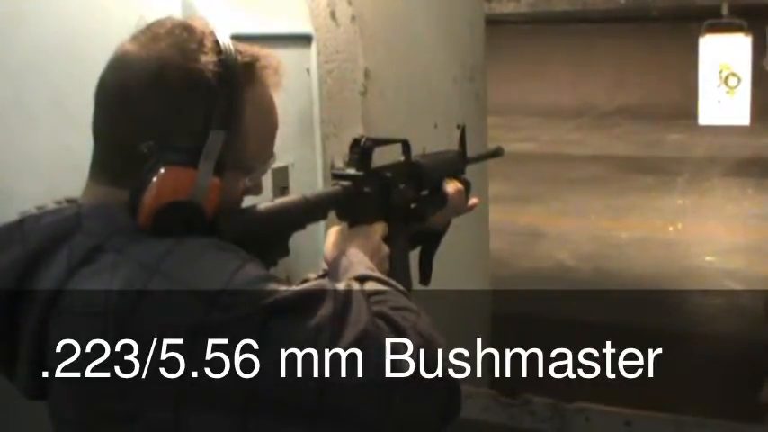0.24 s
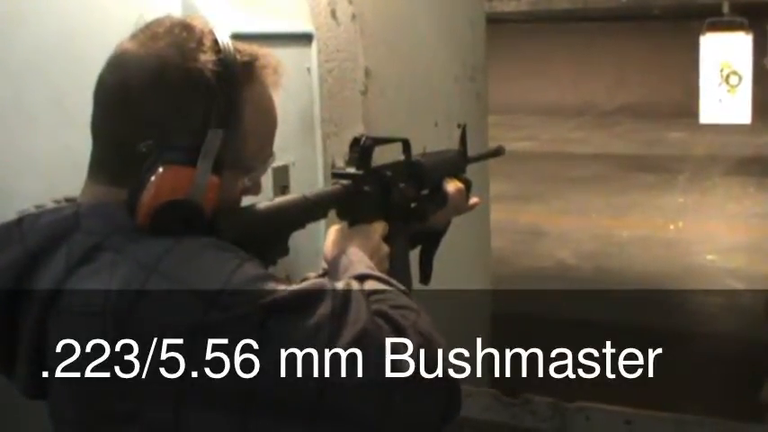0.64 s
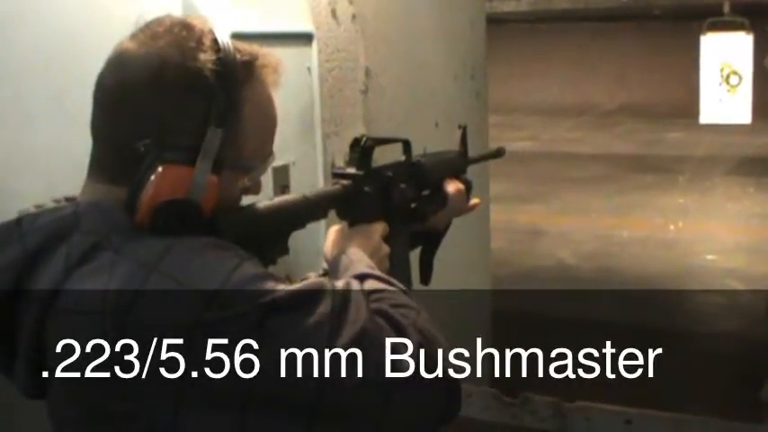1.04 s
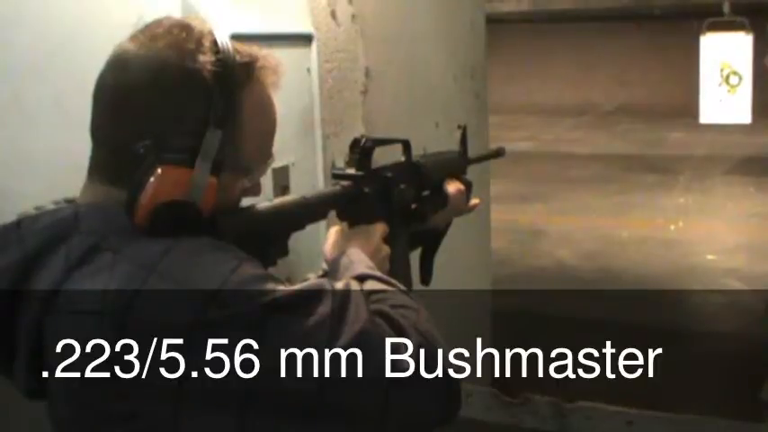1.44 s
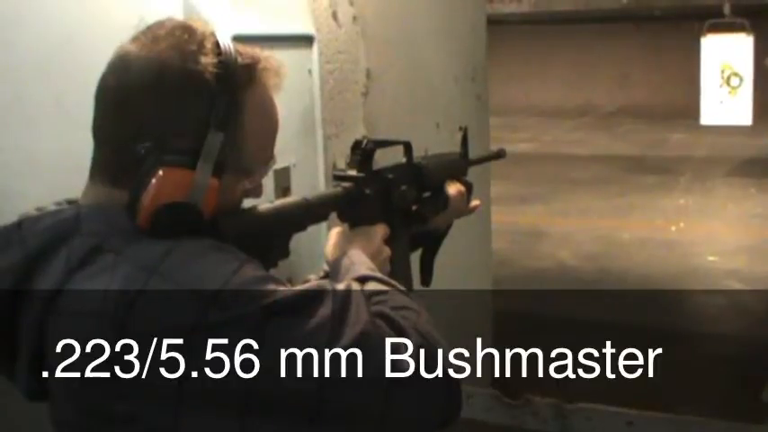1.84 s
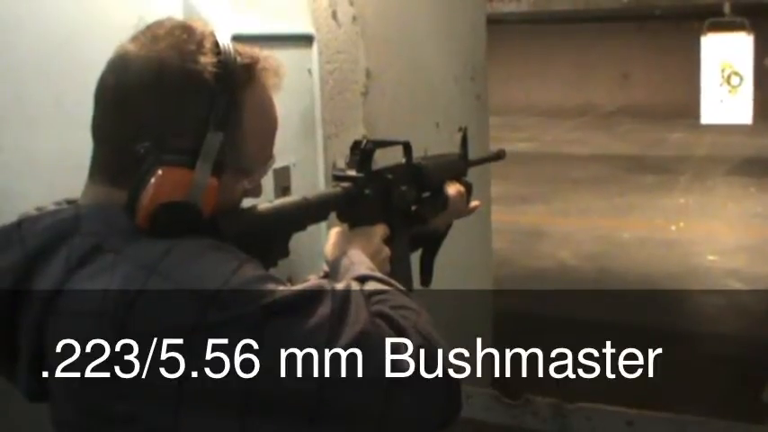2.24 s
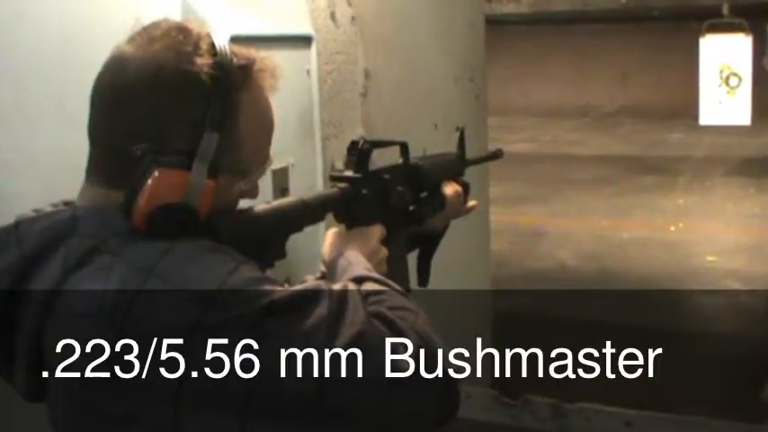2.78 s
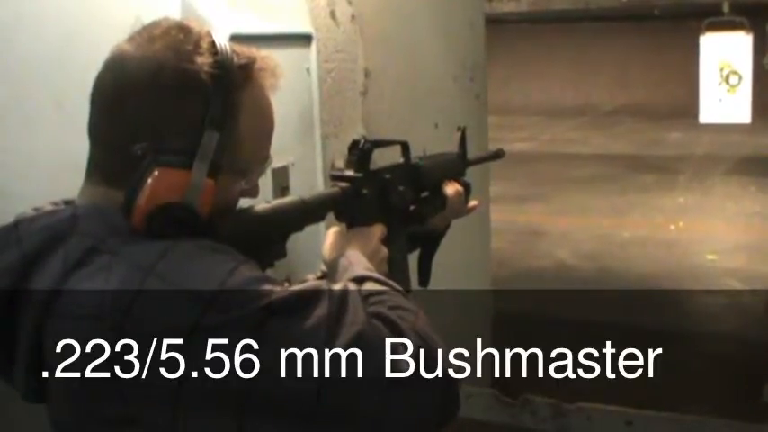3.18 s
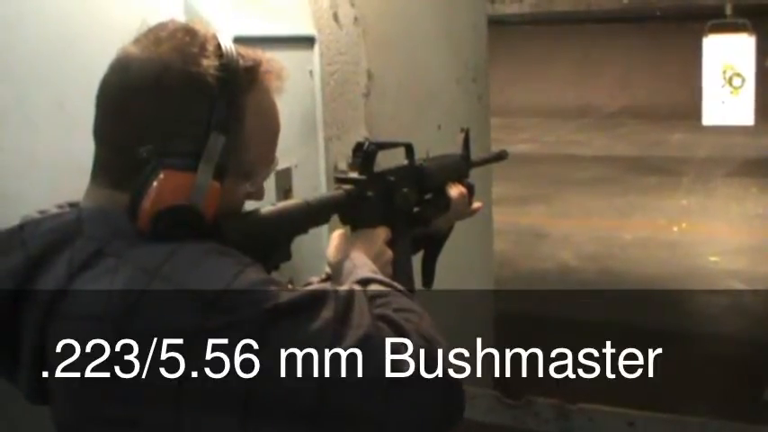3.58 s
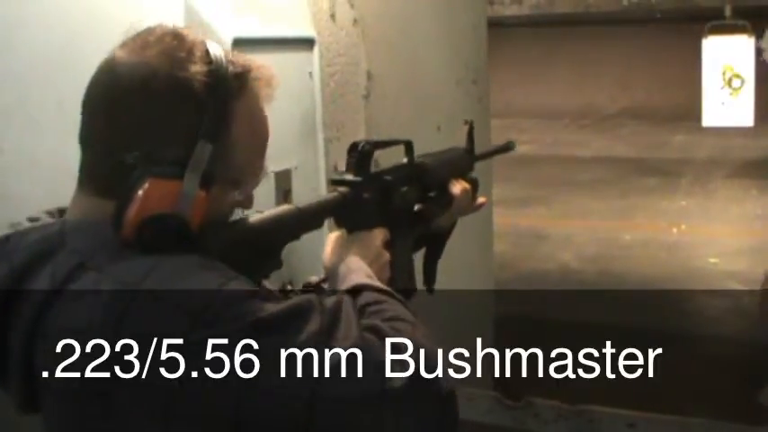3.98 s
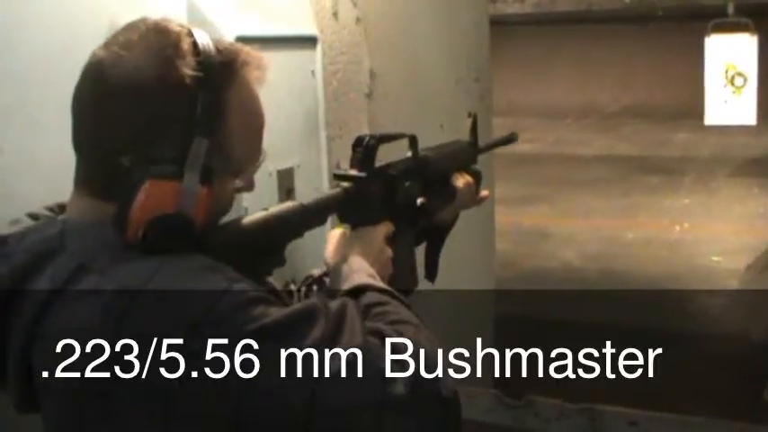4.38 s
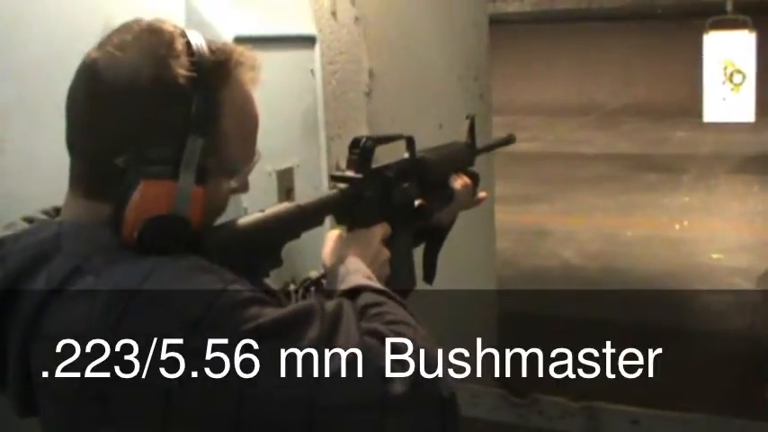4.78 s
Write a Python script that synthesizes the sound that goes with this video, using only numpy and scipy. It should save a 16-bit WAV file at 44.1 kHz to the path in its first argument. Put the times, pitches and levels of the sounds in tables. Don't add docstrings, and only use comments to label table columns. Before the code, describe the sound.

Inside a long concrete shooting range, the tail of an earlier rifle shot dies away over droning ventilation. A blower starts, grit knocks and spent cases tinkle on the floor. One huge blast fills the hall with dense echoes; faint cloth rustle grows, then two quick shots overlap, the second loudest. The stereo microphone overloads, with rasping distortion on each blast.

```python
import sys
import numpy as np
from scipy import signal
from scipy.fft import rfft, irfft, next_fast_len
from scipy.io import wavfile

SR = 44100
rng = np.random.default_rng(int(sys.argv[2]) if len(sys.argv) > 2 else 0)


def master(y):
    cut = np.clip(np.atleast_2d(y).T, -1, 1)
    pcm = np.round(cut * 32767)
    wavfile.write(sys.argv[1], SR, pcm.astype(np.int16))


def volts_from_db(level):
    exponent = np.asarray(level, float) / 20
    return 10 ** exponent


N = 221426

# f/Hz, coherence/1
HALL_LIKENESS = [(60, 0.93), (150, 0.85), (380, 0.6), (950, 0.47), (2380, 0.51), (5980, 0.31),
                 (15000, 0.47)]


def shots():
    # t/s, level/dB
    firings = [
        (-0.6232, 3.2),
        (2.1524, 3.2),
        (3.6830, 1.8),
        (3.9678, 7.5),
    ]
    fired_from = (0, 0, 1, 2)
    ring_s = (2.9, 1.4, 1.1)
    # left minus right/dB, level/dB, treble tilt/(dB/octave), T60/s
    first_echoes = [
        (6, -6.5, 3.5, .24),
        (6, -8.5, 3.5, .24),
        (-4, -8.5, 8.5, .13),
    ]
    # tilt/(dB/octave), lift near 1.3 kHz/dB, T60 factor/1, fill time factor/1
    hall_drive = [
        (.7, -.5, 1.01, 1.01),
        (.7, .8, 1.01, .8),
        (.5, -5.5, .9, 1.6),
    ]
    responses = []
    for length_s, near, hall in zip(ring_s, first_echoes, hall_drive):
        responses.append(blast(length_s, *near, *hall))
    out = np.zeros((2, N))
    for (s, shot_db), stall in zip(firings, fired_from):
        at = round(s * SR)
        start = max(at, 0)
        sound = responses[stall][:, max(-at, 0):N - at]
        out[:, start:start + sound.shape[1]] += volts_from_db(shot_db) * sound
    return out


def blast(length_s, pan_db, first_db, treble_db, first_t60, tilt_db, lift_db, t60_factor, fill_factor):
    # f/Hz, density/(dB per Hz)
    hall_spectrum = [(18, -63), (30, -33), (81, -12), (164, -11), (192, -2), (225, -9), (324, -3),
                     (624, -1), (2030, -13), (2310, -17), (3330, -19), (8110, -34), (15600, -52)]
    # f/Hz, coherence/1
    near_likeness = [(60, 0.43), (180, 0.57), (550, 0.51), (1650, 0.32), (4970, 0.46), (15000, 0.6)]
    # f/Hz, density/(dB per Hz)
    gallery_spectrum = [(59, -46), (100, -16), (233, -12), (261, -21), (282, -7), (334, -20), (388, -8),
                        (495, -13), (645, -2), (824, -1), (1220, -14), (2850, -25), (9000, -55),
                        (11700, -85), (19800, -120)]
    # f/Hz, width/Hz, lift/dB
    gallery_modes = [(650, 25, 6), (700, 20, 6), (775, 20, 8), (820, 18, 10), (855, 18, 9), (995, 25, 7)]
    gallery_db, gallery_t60_s = -32, 4.0
    fill_s, fill_power = .013, .45
    t = np.arange(next_fast_len(int(length_s * SR))) / SR

    hall, power = 0, 0
    for hz, noise in bands(len(t)):
        octaves = np.log2(hz / 1300)
        band_db = at_hz(hall_spectrum, hz) + tilt_db * octaves + lift_db * np.exp(-2 * octaves ** 2)
        noise = noise * volts_from_db(band_db)
        filling = 1 - np.exp(-t / (fill_s * fill_factor * (hz / 1000) ** -fill_power))
        hall = hall + noise * (filling * dying(t, t60_factor * hall_t60(hz)))
        power += np.mean(noise ** 2)

    near = coloured(len(t), hall_spectrum, near_likeness, tilt_db=treble_db)
    near *= volts_from_db([[pan_db / 2], [-pan_db / 2]])
    near *= volts_from_db(first_db) * dying(t, first_t60) * np.minimum(t / .0015, 1)

    late = coloured(len(t), gallery_spectrum, HALL_LIKENESS, gallery_modes)
    late *= volts_from_db(gallery_db) * dying(t, gallery_t60_s) * np.minimum(t / .3, 1)
    return near + hall / np.sqrt(power) + late


def hall_t60(hz):
    wall_t60_s, panel_loss_per_s, panel_hz = 1.46, .17, 480
    air_loss_per_s, air_power = .66, 1.25
    air = air_loss_per_s * (hz / 10000) ** air_power
    panels = panel_loss_per_s / (1 + (hz / panel_hz) ** 4)
    return 1 / (1 / wall_t60_s + air + panels)


def bands(size):
    settle = 2000
    edges = 28 * 2 ** (np.arange(33) / 3.5)
    white = rng.standard_normal((2, 2, size + settle))
    for k, (low, high) in enumerate(zip(edges, edges[1:])):
        band = signal.butter(3, [low, high], "band", fs=SR, output="sos")
        mid, side = signal.sosfilt(band, white[k % 2])[:, settle:]
        hz = np.sqrt(low * high)
        yield hz, pair(mid, side, at_hz(HALL_LIKENESS, hz))


def cases():
    # t/s, knock level/dB, low ring level/dB, high ring level/dB
    landings = [
        (.765, -73, -95, -68),
        (1.221, -71, -67, -80),
        (1.43, -82, -88, -72),
        (1.77, -88, -90, -85),
    ]
    # f/Hz, width/Hz, T60 in the hall/s
    case_rings = [(5300, 600, .62), (11260, 130, .8)]
    # t/s, level/dB
    grit = [
        (.235, -72),
        (.52, -78),
        (.91, -71),
        (4.97, -66),
    ]
    knock = (4200, 6000, .7)  # f/Hz, width/Hz, T60/s
    bounce_s, bounce_knock_db, bounce_ring_db = .06, -10, -5
    bounces = np.add(landings, (bounce_s, bounce_knock_db, bounce_ring_db, bounce_ring_db))
    grit_knocks = [(s, db, -np.inf, -np.inf) for s, db in grit]
    touches = np.vstack([landings, bounces, grit_knocks])
    out = 0
    for k, (hz, width_hz, t60) in enumerate([knock] + case_rings):
        hits = np.zeros(N)
        hits[(touches[:, 0] * SR).astype(int)] = volts_from_db(touches[:, 1 + k])
        out = out + resonant_noise(hz, width_hz) * ringing(hits, t60)
    return out


def ticks():
    # t/s, level/dB
    touches = [
        (.437, -72),
        (2.70, -65),
        (2.725, -70),
        (4.875, -75),
    ]
    hits = np.zeros(N)
    hits[[round(s * SR) for s, _ in touches]] = volts_from_db(np.array(touches)[:, 1])
    return resonant_noise(hz=12000, width_hz=5000) * ringing(hits, t60=.12)


def sleeve():
    # f/Hz, density/(dB per Hz)
    cloth = [(900, -30), (2000, -4), (2800, 0), (3600, -3), (5000, -13), (8500, -16), (11000, -28),
             (16000, -45)]
    peak_s, rise_db_s, peak_db = 3.66, 11, -61.5
    away_s = np.abs(np.arange(N) / SR - peak_s)
    rustle = coloured(next_fast_len(N), cloth, HALL_LIKENESS)[:, :N]
    return volts_from_db(peak_db - rise_db_s * away_s) * rustle


def ducts():
    # f/Hz, density/(dB per Hz)
    air = [(20, -12), (60, -13), (170, -17), (260, -16), (400, -15), (480, -18), (800, -13), (1200, -19),
           (1700, -21), (2500, -28), (4500, -37), (6000, -45), (10000, -53), (16000, -62)]
    # f/Hz, width/Hz, lift/dB
    pipes = [(235, 20, 6), (293, 20, 15), (365, 20, 8), (385, 15, 10)]
    # f/Hz, coherence/1
    likeness = [(60, 1.0), (150, 0.99), (380, 0.94), (950, 0.74), (2380, 0.63), (5980, 0.35), (15000, 0.46)]
    # f/Hz, density/(dB per Hz)
    rumble = [(35, -25), (65, -4), (90, -.5), (160, -1.5), (185, -20), (400, -50)]
    rush_db, rush_idle_db = -49.2, -2.5
    on_s, spin_up_s, idle_db, running_db = .78, .15, -62, -55
    size = next_fast_len(N)
    speed = np.clip((np.arange(N) / SR - on_s) / spin_up_s, 0, 1)
    rush = volts_from_db(rush_db + rush_idle_db * (1 - speed)) * coloured(size, air, likeness, pipes)[:, :N]
    swell = volts_from_db(idle_db + (running_db - idle_db) * speed)
    return rush + swell * coloured(size, rumble, likeness)[:, :N]


def coloured(size, spectrum, likeness, modes=(), tilt_db=0):
    hz = np.maximum(np.arange(size // 2 + 1) * SR / size, 1)
    lift = 1 + sum(volts_from_db(db) / (1 + (2 * (hz - top) / width) ** 2) for top, width, db in modes)
    gain = lift * volts_from_db(at_hz(spectrum, hz) + tilt_db * np.log2(hz / 1000))
    mid, side = rfft(rng.standard_normal((2, size)))
    return rms_one(irfft(gain * pair(mid, side, at_hz(likeness, hz)), size))


def resonant_noise(hz, width_hz):
    r = np.exp(-np.pi * width_hz / SR)
    section = [1, 0, -1, 1, -2 * r * np.cos(2 * np.pi * hz / SR), r * r]
    mid, side = signal.sosfilt([section, section], rng.standard_normal((2, N)))
    return rms_one(pair(mid, side, .6))


def ringing(hits, t60):
    return signal.lfilter([1], [1, -volts_from_db(-60 / (t60 * SR))], hits + 1e-18)


def dying(t, t60):
    return np.exp(-np.log(1000) * t / t60)


def pair(mid, side, alike):
    alike = np.clip(alike, 0, 1)
    return np.sqrt(1 + alike) * mid + np.sqrt(1 - alike) * side * [[1], [-1]]


def at_hz(points, hz):
    points = np.array(points)
    return np.interp(np.log(hz), np.log(points[:, 0]), points[:, 1])


def rms_one(x):
    return x / np.sqrt(np.mean(x ** 2) + 1e-20)


def scene():
    return shots() + cases() + ticks() + sleeve() + ducts()


def level_db(x, over_s):
    r = np.exp(-1 / (over_s * SR))
    return 10 * np.log10(signal.lfilter([1 - r], [1, -r], np.mean(x ** 2, axis=0)) + 1e-12)


def rasp(pressure):
    # f/Hz, density/(dB per Hz)
    spectrum = [(20, 6), (60, 11), (140, 16), (220, -8), (2000, -11), (4000, -4), (6000, -.5), (9000, -3.5),
                (12000, -6.5), (16000, -17)]
    # f/Hz, coherence/1
    likeness = [(150, .05), (3000, .6), (8000, .85), (16000, .9)]
    rasp_db, limit_db = -27, -.9
    fall, rise = 2.9, .5
    over_db = np.minimum(level_db(pressure, .012) - limit_db, 7)
    strength = volts_from_db(rasp_db + np.minimum(fall * over_db, rise * over_db))
    swing = .45 + .75 * np.minimum(np.abs(np.mean(pressure, axis=0)), 1.6)
    return strength * swing * coloured(next_fast_len(N), spectrum, likeness)[:, :N]


def gain_control(x):
    limit_db, share, release_db_s, listen_s = -15, .22, 11, .008
    ramp = release_db_s * np.arange(N) / SR
    over_db = np.maximum(level_db(x, listen_s) - limit_db, 0)
    reduction_db = np.maximum.accumulate(share * over_db + ramp) - ramp
    return x * volts_from_db(-reduction_db)


def roll_off(x):
    return signal.sosfilt(signal.butter(12, 15740, fs=SR, output="sos"), x)


def record(dry):
    capsule_top, knee, bass_cut_hz, bass_floor_hz = 1.08, 12.0, 380, 40
    cut, floor = np.exp(-2 * np.pi * np.array([bass_cut_hz, bass_floor_hz]) / SR)
    pressure = signal.lfilter([1, -cut], [1, -floor], dry)
    flattened = pressure / (1 + np.abs(pressure / capsule_top) ** knee) ** (1 / knee)
    bass_cut = signal.lfilter([1, -floor], [1, -cut], flattened)
    mix = gain_control(bass_cut) + rasp(pressure)
    return roll_off(np.clip(mix, -1, 1))


dry = scene()
out = record(dry)
master(out)
```